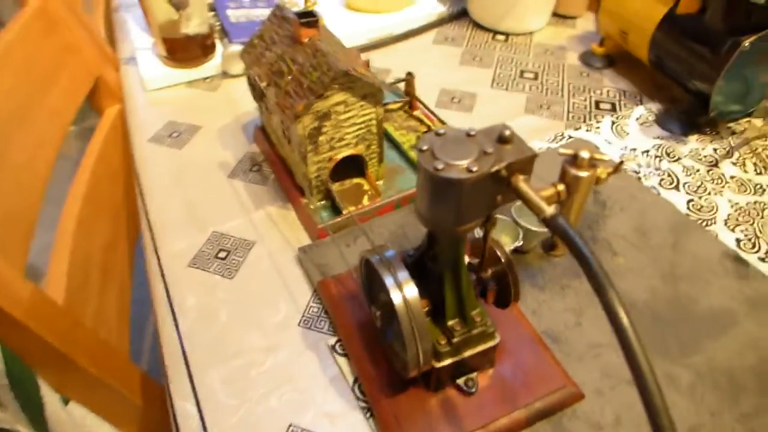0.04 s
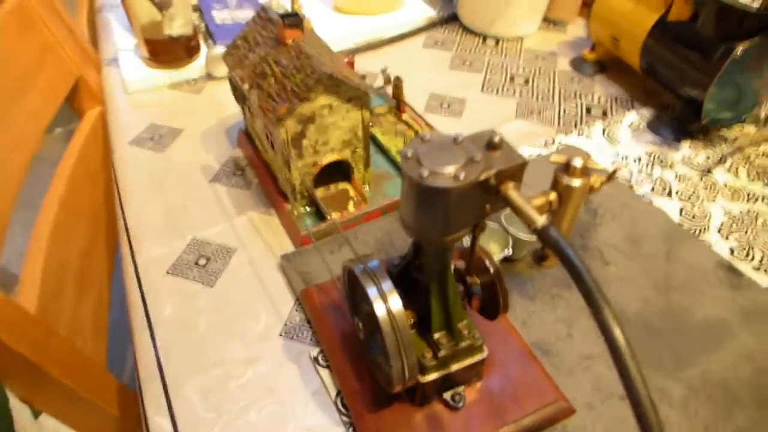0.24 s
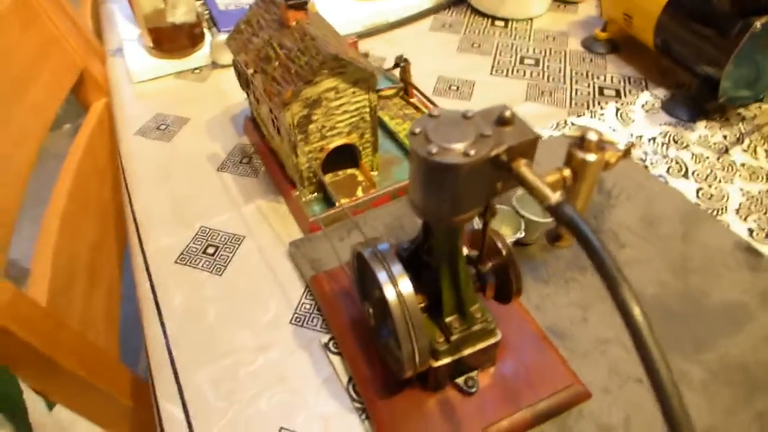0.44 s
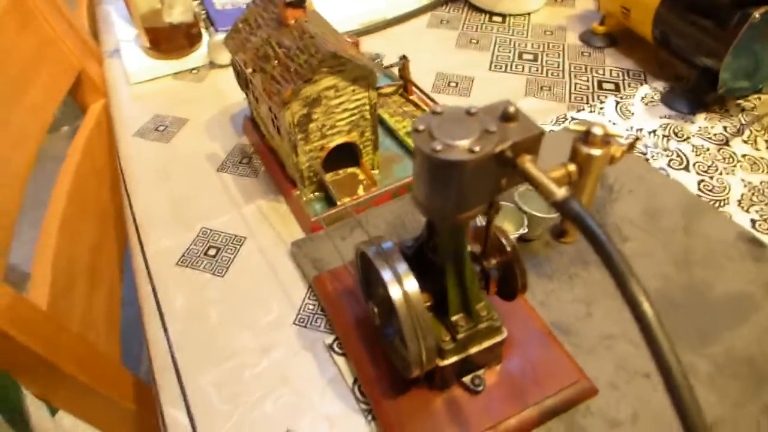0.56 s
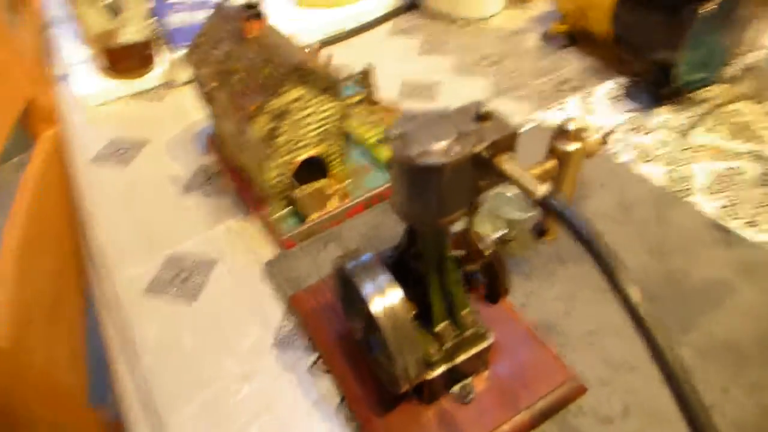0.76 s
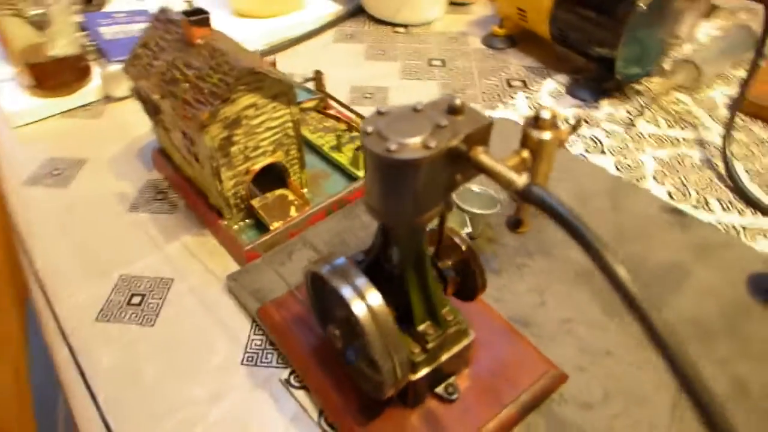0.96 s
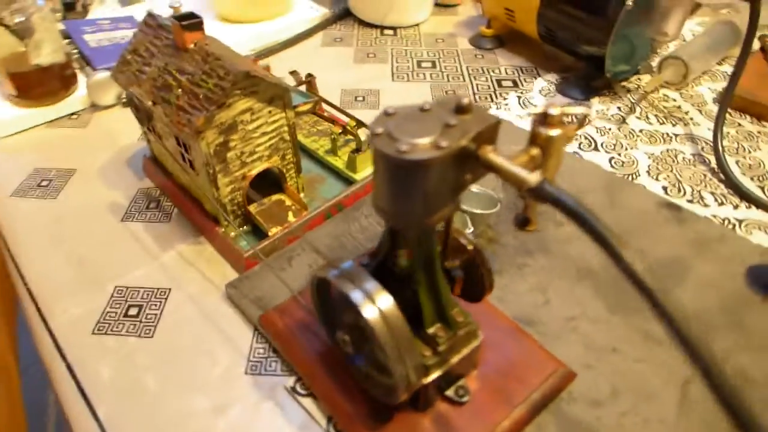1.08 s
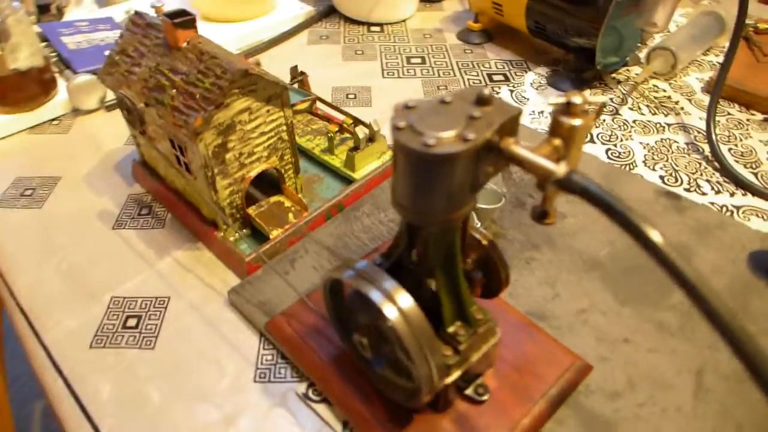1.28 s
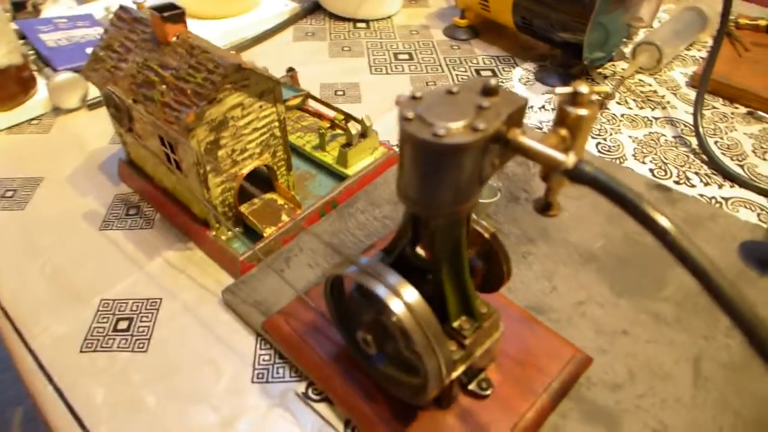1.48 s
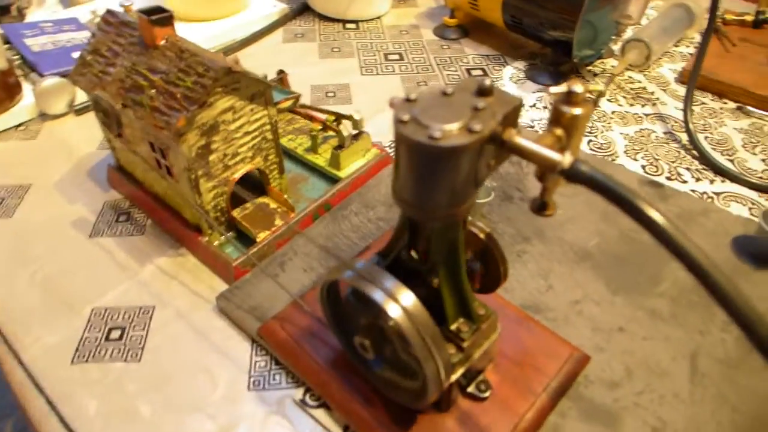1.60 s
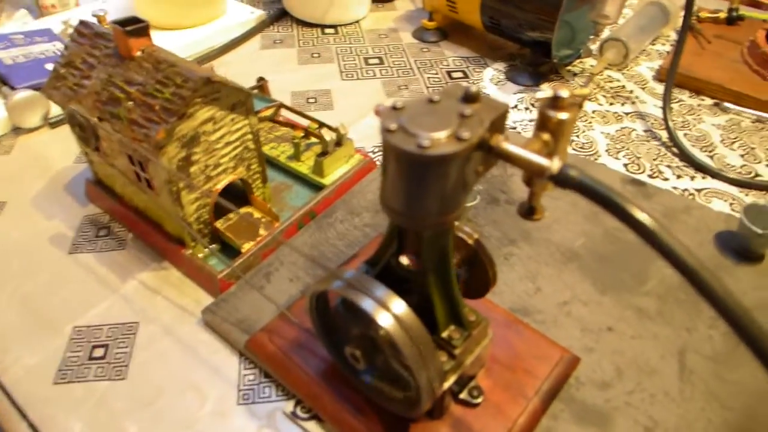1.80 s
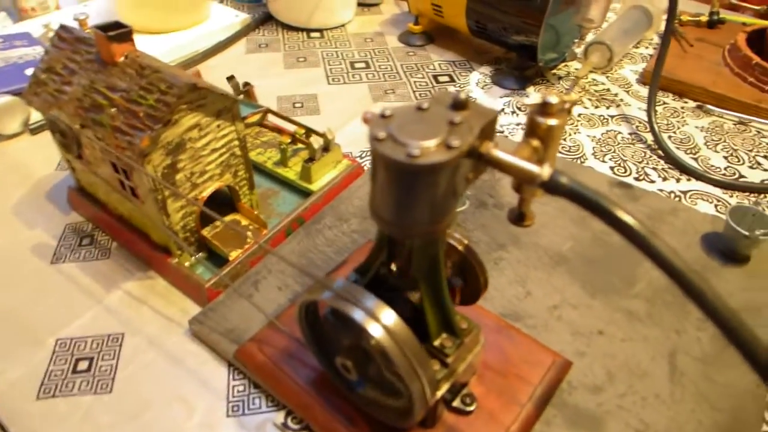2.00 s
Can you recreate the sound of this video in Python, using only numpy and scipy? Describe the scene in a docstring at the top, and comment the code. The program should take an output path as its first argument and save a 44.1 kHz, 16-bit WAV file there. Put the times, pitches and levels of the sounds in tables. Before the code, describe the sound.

Small model steam engine chuffing fast and evenly on a table, with metallic knocking and a few squeaks

```python
"""A small single-cylinder model steam engine runs on compressed air on a table in a small room.
A stick-slip chirp (swept sine, overtones, ringing modes) opens the scene; three more follow at uneven gaps.
About nine turns a second: a sharp exhaust puff (gated, coloured noise) thumps the frame, then a softer
return puff, with crank knocks ringing frame and base (decaying sines). Noise-burst ticks fall between.
Throughout: leaking air (coloured noise) over a low hum (narrow noise bands)."""
import sys
import numpy as np
from scipy import signal
from scipy.fft import rfft, irfft
from scipy.io import wavfile
from scipy.ndimage import uniform_filter1d

SR = 44100
rng = np.random.default_rng(int(sys.argv[2]) if len(sys.argv) > 2 else 0)


def dump(signal):
    """Clip the signal to [-1, 1] and save it as 16-bit WAV at the path in sys.argv[1]."""
    limited = np.clip(np.atleast_2d(signal).T, -1, 1)
    pcm = np.round(limited * 32767).astype(np.int16)
    wavfile.write(sys.argv[1], SR, pcm)


N = 89964
T = np.arange(N) / SR

# Levels are relative; the *_DB settings below are added to them.
# sharp exhaust puffs: start_s, hiss_db, thump_db, port_open_s, upper_mode_lift_db
EXHAUST_PUFFS = [(.024, -15, -18.5, 0.0084, 2), (.1595, -16.5, -18, 0.0068, 7.5),
                 (0.2834, -16.5, -14, 0.0088, 1), (.395, -14.5, -21, 0.0056, -11),
                 (.504, -14.5, -14.5, 0.0065, 5), (.620, -17, -14.5, 0.0065, 4.5),
                 (0.7679, -15.5, -13, 0.011, -2), (.888, -14.5, -10.5, 0.0078, -4),
                 (1.007, -16, -11.5, 0.0094, 1.5), (1.127, -15.5, -14, 0.0095, 1.5),
                 (1.239, -16.5, -12.5, 0.0099, 2.5), (1.349, -17.5, -12, 0.01, -2.5),
                 (1.4581, -13.5, -13.5, 0.0063, -22), (1.5655, -15.5, -13, 0.0068, -4),
                 (1.678, -16.5, -8.5, 0.011, -13), (1.799, -18, -15.5, 0.0089, 6.5),
                 (1.898, -13.5, -12.5, 0.0057, -1), (1.993, -18, -14.5, 0.0053, 0.5)]
# softer puffs of the return stroke: start_s, hiss_db, port_open_s
RETURN_STROKE_PUFFS = [(0.084, -15.5, .007), (0.211, -19.5, .011), (0.323, -22, 0.012),
                       (0.431, -13, 0.0051), (0.551, -21.5, 0.0089), (0.7, -16, 0.0091),
                       (0.821, -22.5, 0.017), (0.937, -16.5, 0.01), (1.059, -18.5, 0.014),
                       (1.172, -23.5, 0.02), (1.282, -17, 0.012), (1.395, -16.5, 0.0078),
                       (1.5, -26.5, 0.014), (1.606, -20.5, 0.016), (1.739, -19, 0.012), (1.828, -19, 0.015),
                       (1.939, -21, 0.0072), (2.027, -16, 0.0094)]
# colour of the exhaust hiss: freq_hz, density_db (per Hz)
HISS_COLOUR = [(60, -42), (200, -10.5), (470, -7), (600, 8.5), (780, 3.5), (950, 0.5), (1250, -6.5),
               (1550, 6.5), (1850, -5), (2500, 2.5), (3300, -0.5), (3800, -2.5), (5000, 0.5), (6300, -1),
               (10000, -1), (13500, -6.5), (14300, -10), (15300, -21), (16000, -28)]
# narrow resonances of the exhaust passage: freq_hz, width_hz, level_db
PASSAGE_RESONANCES = [(2225, 160, -8.5), (3390, 126, -6), (5000, 140, -3.5)]
# knocks of the crank: start_s, level_db, upper_mode_lift_db
CRANK_KNOCKS = [(.053, -21, 15), (.085, -10, 3), (.186, -14.5, 5), (.222, -9, -1), (.243, -13.5, 5.5),
                (.327, -9.5, 6), (.437, -8, 6), (.558, -11, 6.5), (.704, -8.5, -3), (.827, -2.5, -2),
                (.938, -16, -3), (1.065, -5, 0), (1.176, -6.5, 1), (1.288, -2, -7), (1.400, -6, -2),
                (1.505, -8, 5.5), (1.614, -4.5, -4), (1.745, -7, 3.5), (1.840, -1, -1), (1.949, -11, 7),
                (2.031, -4, 0)]
# modes of frame and base: freq_hz, puff_level_db, knock_level_db, t60_s
FRAME_MODES = [(558, 5, 1.5, 0.15), (603.4, -5.5, -0.5, 0.12), (627.3, -2.5, -0.5, 0.12),
               (662, -19, -17, 0.059), (719.8, -1, 0.5, 0.11), (747.4, -9, -9, 0.1), (783, -4, -25, 0.085),
               (803, -7.5, -24, 0.14), (968, -11, -6, 0.084), (1036, -11, -14.5, 0.15),
               (1084, -12.5, -15, 0.26), (1213, -18, -19, 0.15), (1608, -10.5, -14, 0.11),
               (2374, -6.5, -10, 0.066)]
# ticks and spits: start_s, level_db, centre_hz
TICK_BURSTS = [(.011, -23.5, 5330), (0.151, -28, 5500), (0.567, -32, 6000), (0.579, -20.5, 4070),
               (.586, -25, 10000), (1.120, -18, 5970), (1.324, -17, 8550), (1.399, -11, 8460),
               (1.942, -18, 7900)]
# squeaky chirps: start_s, level_db, pitch_ratio
CHIRP_EVENTS = [(-.002, -7.5, 0.98), (.912, -7, 0.97), (1.3207, -8.5, 2), (1.7799, -8.5, 0.93)]
# chirp pitch before pitch_ratio: after_start_s, pitch_hz
CHIRP_SWEEP = [(0, 1900), (.0025, 2750), (.004, 1630), (.0055, 1380), (.008, 960)]
# modes the chirps set ringing: freq_hz, level_db, t60_s
CHIRP_RINGS = [(982, 7.5, 0.041), (1096, 0.5, 0.061), (1565, 2, 0.051), (1622, -4.5, 0.055),
               (2484, -9.5, 0.18), (2667, -0.5, 0.019)]
# colour of leaking air and room noise: freq_hz, density_db (per Hz)
LEAK_COLOUR = [(25, -5), (70, -7), (100, -1), (125, 6), (190, 3), (300, 7), (450, 7.5), (700, 2.5),
               (1200, 7.5), (2000, -6.5), (5000, -0.5), (10000, -4.5), (16000, -11.5)]
# low hum bands: centre_hz, level_db
HUM_BANDS = [(124, -55), (216, -51), (266, -56.5), (339, -53)]
# share of the sound that differs between the ears: freq_hz, side_db
EAR_DIFFERENCE = [(30, -9), (100, -18), (300, -19), (580, -17.5), (1200, -9.5), (3000, -7.5), (12000, -5.5)]

PUFF_DB, RETURN_DB, THUMP_DB, KNOCK_DB = -1, -2.5, -10.5, -16.5
TICK_DB, CHIRP_DB, CHIRP_RING_DB, LEAK_DB = -4, -5.5, -34, -34
UPPER_MODES_HZ, CHIRP_BRIGHT_HZ, CUTOFF_HZ = 660, 3020, 16300
ROOM_T60_S, ROOM_TREBLE_T60_S, ROOM_GAP_S = 0.29, 0.19, .003


def exhaust(sputter_db, edge_hz, bass_db):
    """The valve lets out two sputtering air bursts a turn; the passage colours them and passes little bass."""
    flow = np.zeros(N)
    for start_s, hiss_db, _, open_s, _ in EXHAUST_PUFFS:
        flow += from_db(hiss_db + PUFF_DB) * burst(start_s, 0.0035, open_s, 0.007)
    for start_s, hiss_db, open_s in RETURN_STROKE_PUFFS:
        flow += from_db(hiss_db + RETURN_DB) * burst(start_s, 0.0042, open_s, 0.0025)
    wobble = rms_one(uniform_filter1d(rng.standard_normal(N), size=40))
    jet = noise(HISS_COLOUR) * flow * from_db(sputter_db * wobble)
    bass = resonance(high_pass(jet, 45, order=2), 230, 360)
    air = high_pass(jet, edge_hz, order=8) + from_db(bass_db) * bass
    return air + sum(from_db(db) * resonance(air, hz, width_hz) for hz, width_hz, db in PASSAGE_RESONANCES)


def frame(scatter_db, detune, chatter, chatter_s, low_cut_hz):
    """Puffs strike the frame at the cylinder, knocks at the crank; slack bearings chatter after each blow."""
    mode_hz, puff_db, knock_db, t60_s = np.transpose(FRAME_MODES)
    blows = [(s + 0.00201, db + THUMP_DB, lift_db, puff_db) for s, _, db, _, lift_db in EXHAUST_PUFFS]
    blows += [(s, db + KNOCK_DB, lift_db, knock_db) for s, db, lift_db in CRANK_KNOCKS]
    ring_t = T[:SR // 5]
    decay = np.exp(-np.log(1000) * np.outer(1 / t60_s, ring_t))
    # every blow varies the level and pitch of each mode
    variations = rng.standard_normal((len(blows), 2, len(mode_hz)))
    struck = np.zeros(N + SR)
    for (start_s, db, lift_db, mode_db), (louder, sharper) in zip(blows, variations):
        lifted_db = lift_db * (mode_hz > UPPER_MODES_HZ)
        strength = from_db(db + mode_db + lifted_db + scatter_db * louder)
        blow_hz = mode_hz * (1 + detune * sharper)
        rings = np.sin(2 * np.pi * np.outer(blow_hz, ring_t)) * decay
        first = max(int(start_s * SR), 0)
        struck[first:first + len(ring_t)] += strength @ rings
    gate = sum(from_db(db) * burst(s, 0.00068, 0.0037, chatter_s) for s, db, _, _ in blows)
    rattle = chatter * rng.standard_normal(N) * gate
    rattle_ring = sum(from_db(db) * ring(rattle, hz, mode_t60_s) for hz, db, _, mode_t60_s in FRAME_MODES)
    return high_pass(struck[:N] + rattle_ring, low_cut_hz, order=8)


def ticks(width_share):
    """Loose parts and spitting air: very short bursts of band-passed noise, width proportional to centre."""
    white = rng.standard_normal(N)
    out = np.zeros(N)
    for start_s, db, hz in TICK_BURSTS:
        band = rms_one(resonance(white, hz, hz * width_share))
        out += from_db(db + TICK_DB) * band * burst(start_s - .0005, 0.00023, 0.0015, 0.00069)
    return out


def chirps(overtone_db, rough):
    """A stick-slip squeak flicks up, drops into a coarse rasp within a few milliseconds and rings on."""
    after_s, pitch_hz = np.transpose(CHIRP_SWEEP)
    squeak = np.zeros(N)
    for start_s, db, ratio in CHIRP_EVENTS:
        sweep_hz = np.interp(T - start_s, after_s, pitch_hz)
        phase = 2 * np.pi * ratio * np.cumsum(sweep_hz * (T > start_s)) / SR
        # overtones fade as the unscaled sweep rises
        overtones = sum(np.sin(k * phase) / (1 + (k * sweep_hz / CHIRP_BRIGHT_HZ) ** 8) for k in (2, 3))
        tone = np.sin(phase) + from_db(overtone_db) * overtones
        squeak += from_db(db + CHIRP_DB) * tone * burst(start_s, 0.0014, 0.0026, 0.0028)
    roughness = 1 + rough * rms_one(uniform_filter1d(rng.standard_normal(N), size=30))
    squeak = high_pass(squeak * roughness, 450, order=4)
    rings = sum(from_db(db) * ring(squeak, hz, t60_s) for hz, db, t60_s in CHIRP_RINGS)
    return squeak + from_db(CHIRP_RING_DB) * rings


def background(hum_width_hz, spread_db):
    """Steady wide leak noise over a centred hum; narrow noise bands make the hum waver."""
    hum = np.zeros(N)
    for hz, db in HUM_BANDS:
        band = resonance(rng.standard_normal(N + SR), hz, hum_width_hz)
        band = resonance(band, hz, hum_width_hz)[SR:]  # skip the build-up
        hum += from_db(db) * rms_one(band)
    leak = stereo(noise(LEAK_COLOUR), from_db(spread_db) * noise(LEAK_COLOUR))
    return hum + from_db(LEAK_DB) * leak


def room(x, wet_db, count=13):
    """Direct sound plus diffuse reflections: random noise tails, crossfaded so no steady tones stand out."""
    tail_position = np.linspace(0, count - 1, N)
    wet = np.zeros((2, N))
    for k in range(count):
        fade = np.sqrt(np.maximum(1 - abs(tail_position - k), 0))  # equal-power crossfade
        wet += signal.fftconvolve((x * fade)[None], room_tail(), axes=1)[:, :N]
    return x + from_db(wet_db) * wet


def room_tail():
    """A dense stereo noise tail whose treble dies sooner."""
    t = T[:SR // 2]
    white = rng.standard_normal((2, len(t)))
    low = signal.sosfilt(signal.butter(1, 4000, fs=SR, output="sos"), white)
    low_decay = np.exp(-np.log(1000) * t / ROOM_T60_S)
    treble_decay = np.exp(-np.log(1000) * t / ROOM_TREBLE_T60_S)
    tail = (low * low_decay + (white - low) * treble_decay) * (t > ROOM_GAP_S)
    return stereo(*tail / np.sqrt(np.sum(tail[0] ** 2)))


def stereo(mid, side):
    """Two close microphones: alike in the bass, less so in the treble."""
    return mid + colour(side, EAR_DIFFERENCE) * np.array([[1], [-1]])


def noise(points):
    """Coloured noise of RMS 1."""
    return rms_one(colour(rng.standard_normal(N), points))


def colour(x, points):
    """Shape a spectrum by a (Hz, dB) curve, interpolated over log frequency."""
    size = x.shape[-1]
    hz, db = np.transpose(points)
    bin_hz = np.maximum(np.arange(size // 2 + 1) * SR / size, 1)
    gain = from_db(np.interp(np.log(bin_hz), np.log(hz), db))
    return irfft(rfft(x) * gain, size)


def burst(start_s, attack_s, hold_s, decay_s):
    """Linear rise, hold, exponential release; hold_s counts from the start."""
    t = T - start_s
    return np.clip(t / attack_s, 0, 1) * np.exp(-np.clip((t - hold_s) / decay_s, 0, 20))


def ring(x, hz, t60_s):
    """Two-pole mode: a unit click sets a decaying sine of height 1 ringing."""
    r, w = np.exp(-np.log(1000) / (t60_s * SR)), 2 * np.pi * hz / SR
    return signal.lfilter([0, np.sin(w)], [1, -2 * r * np.cos(w), r * r], x + 1e-18)


def resonance(x, hz, width_hz):
    """Two-pole band-pass with peak gain 1."""
    r, w = np.exp(-np.pi * width_hz / SR), 2 * np.pi * hz / SR
    return signal.lfilter(np.array([1, 0, -1]) * (1 - r * r) / 2, [1, -2 * r * np.cos(w), r * r], x)


def high_pass(x, hz, order):
    """Butterworth bass cut."""
    return signal.sosfilt(signal.butter(order, hz, "high", fs=SR, output="sos"), x)


def from_db(db):
    """Decibels to amplitude ratio."""
    return 10 ** (np.asarray(db) / 20)


def rms_one(x):
    """Scale to RMS 1."""
    return x / np.sqrt(np.mean(x ** 2) + 1e-20)


def scene():
    """Engine and chirps in the room, over the background."""
    dry_air = exhaust(sputter_db=0.8, edge_hz=560, bass_db=0) + ticks(width_share=0.59)
    air = room(dry_air, wet_db=-2.5)
    dry_metal = frame(scatter_db=1.1, detune=.011, chatter=0.015, chatter_s=0.0049, low_cut_hz=567)
    metal = room(dry_metal, wet_db=-9.5)
    squeaks = room(chirps(overtone_db=1, rough=0.49), wet_db=-7.5)
    return air + metal + squeaks + background(hum_width_hz=6.2, spread_db=4.0)


def record(dry):
    """Steep low-pass: 60 dB down from CUTOFF_HZ up."""
    return signal.sosfilt(signal.cheby2(16, 60, CUTOFF_HZ, fs=SR, output="sos"), dry)


dry = scene()
out = record(dry)
dump(out)
```